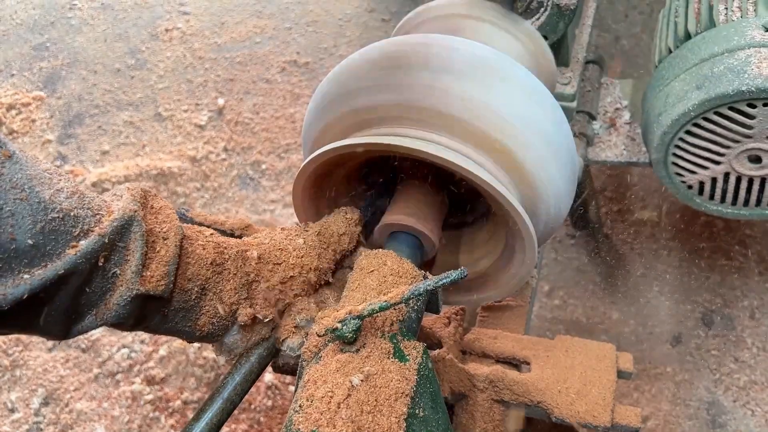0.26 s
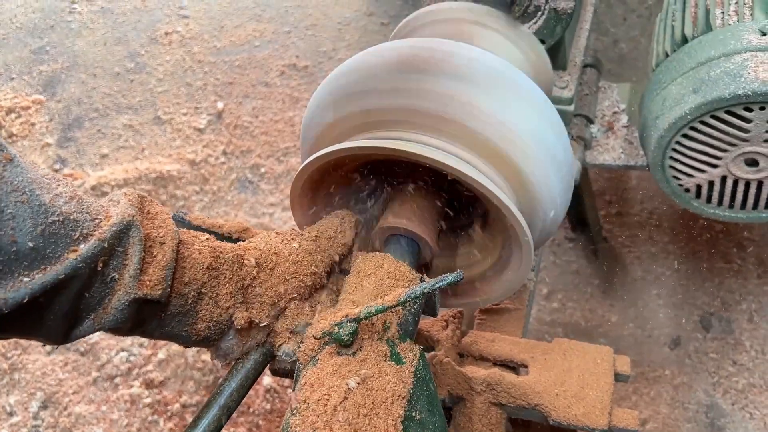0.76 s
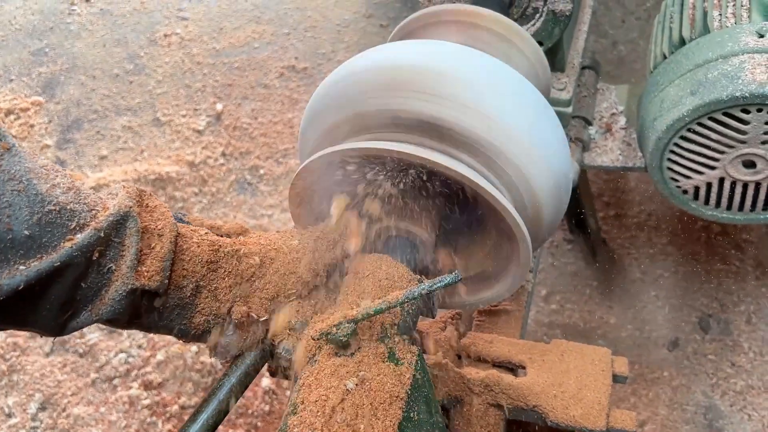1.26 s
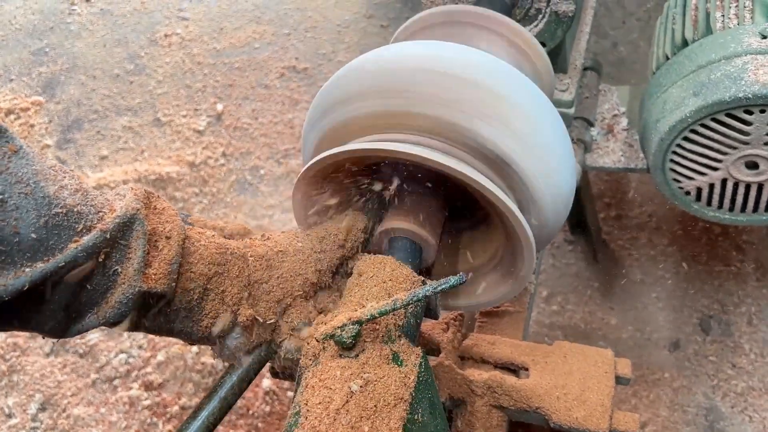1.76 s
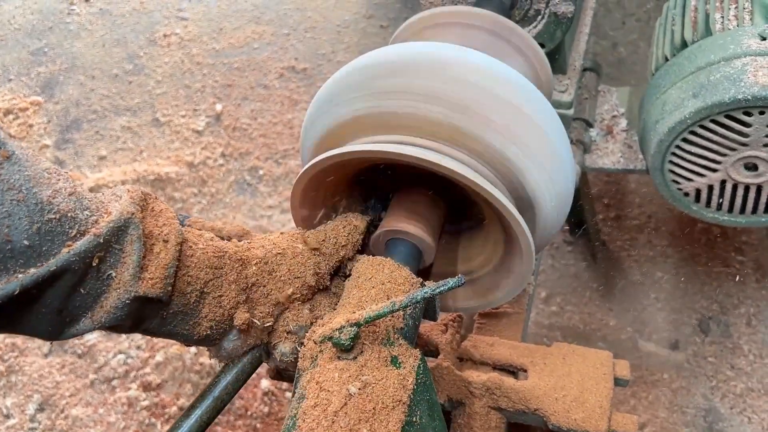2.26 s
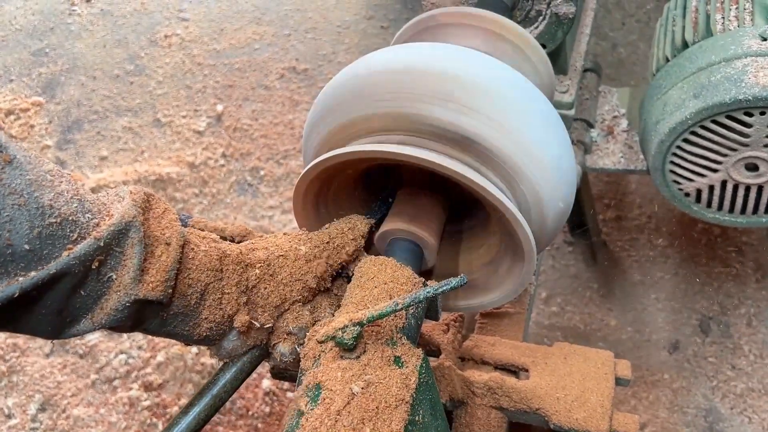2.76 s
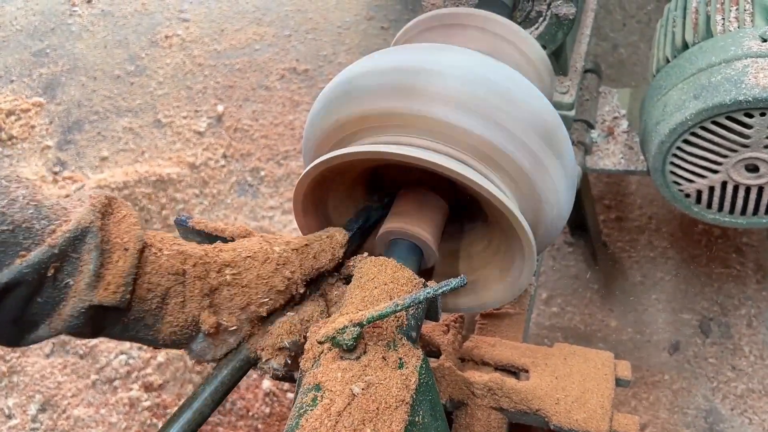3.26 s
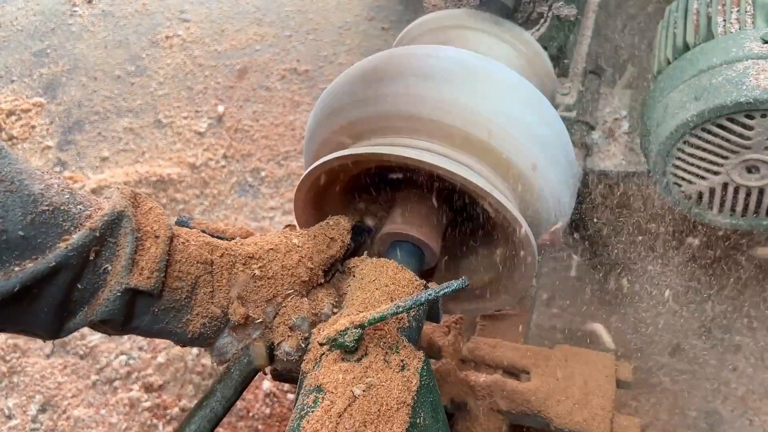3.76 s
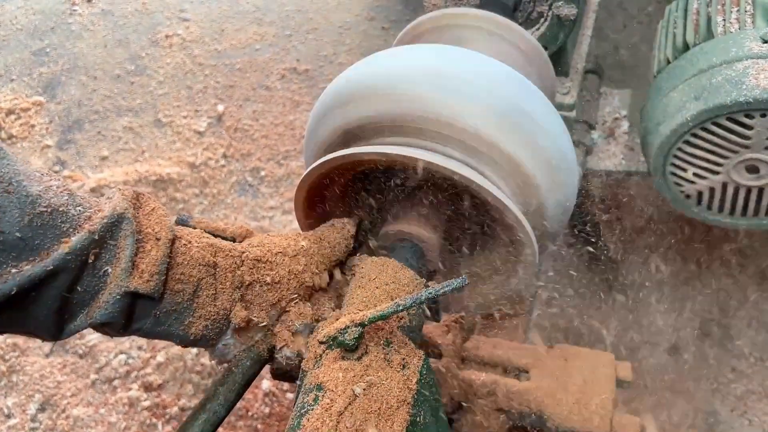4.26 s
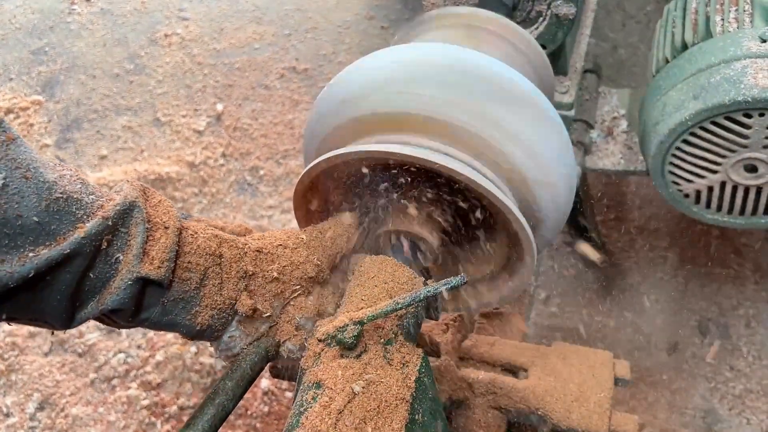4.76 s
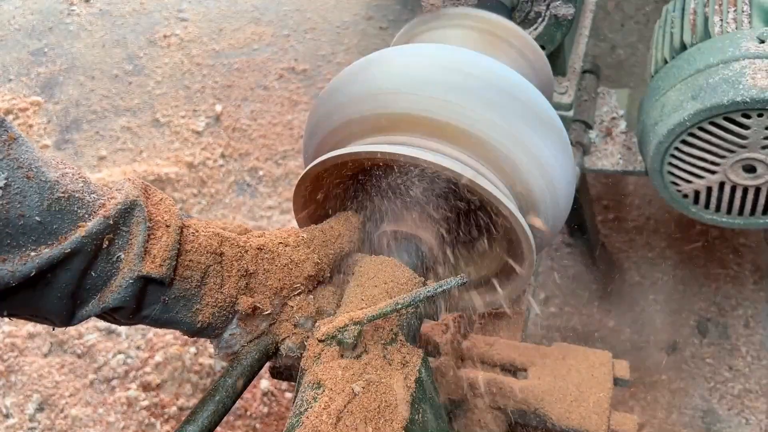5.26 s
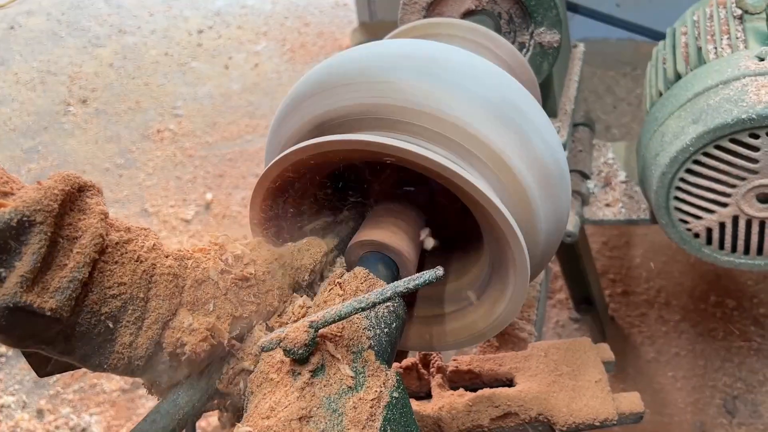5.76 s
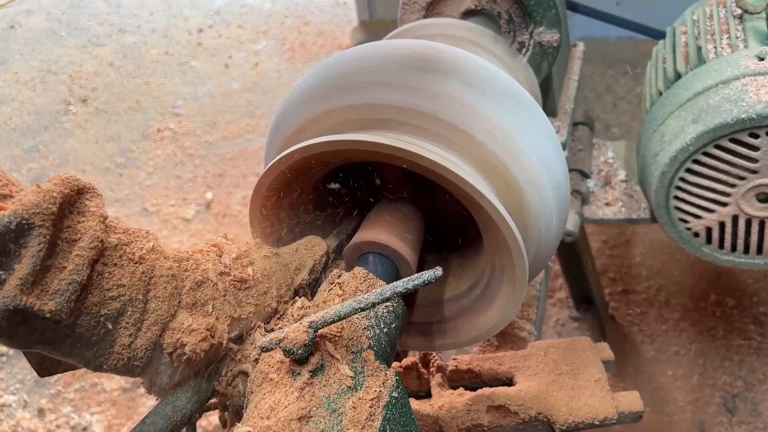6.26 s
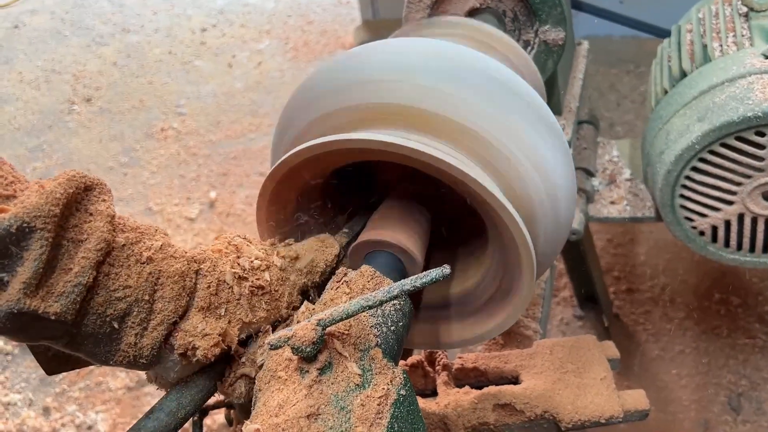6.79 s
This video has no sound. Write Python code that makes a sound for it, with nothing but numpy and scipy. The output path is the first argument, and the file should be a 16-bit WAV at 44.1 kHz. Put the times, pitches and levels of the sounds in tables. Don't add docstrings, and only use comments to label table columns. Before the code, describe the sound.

A lathe hums and rumbles steadily in an open workshop, heard closely in stereo with a short, thin tail. From 0 to 0.45 seconds a hooked steel tool scrapes inside the spinning wooden vessel, with hiss, small chips and brief mid-pitched rings near 900 hertz. It eases off, then from 0.7 regular chatter ticks build, about twenty a second, with swelling scrape. Around 1.65 to 1.95 the shank rings hardest, a rough metallic groan; heavy pulsing bites continue until 3.3. The tool lifts, leaving hum, faint dust hiss and light touches. From 4.5 to 5.45 a quiet skim scrapes with weak rings. A tiny near-silent gap at 5.57 cuts to a closer, louder machine. From 5.7 bright, sizzling shavings and sharp chips dominate, with stronger catches around 6.5 to 6.6, easing near 6.95 before a last touch and low thud at 7.

```python
import sys
import numpy as np
from scipy import signal
from scipy.fft import rfft, irfft, next_fast_len
from scipy.io import wavfile
from scipy.ndimage import uniform_filter1d, map_coordinates

SR = 44100
rng = np.random.default_rng(int(sys.argv[2]) if len(sys.argv) > 2 else 0)


def master(y):
    cut = np.clip(np.atleast_2d(y).T, -1, 1)
    pcm = np.round(cut * 32767)
    wavfile.write(sys.argv[1], SR, pcm.astype(np.int16))


def undo_db(level):
    steps = np.asarray(level, float) / 20
    return 10 ** steps


N = 310023
T = np.arange(N) / SR
HZ = np.fft.rfftfreq(next_fast_len(N), 1 / SR)

PASS_ENDS = 3.4, 5.58
PASS = np.searchsorted(PASS_ENDS, T)

# time_s, edge_pressure_db, hook_grip_db
PUSH_ENTRY = [(0.0, -30, -18), (0.15, -29.5, -20.5), (0.21, -24.5, -16), (0.274, -25, -14.5),
              (0.344, -31, -19.5), (0.419, -29.5, -22), (0.474, -59, -27), (0.519, -58, -36)]
PUSH_BUILD = [(0.673, -45, -24.5), (0.753, -35, -23.5), (0.873, -38, -28.5), (1.053, -27.5, -17),
              (1.117, -33, -22), (1.3, -28, -16.5), (1.537, -31, -21), (1.706, -27, -11), (1.831, -33, -14)]
PUSH_HEAVY = [(1.911, -26.5, -10.5), (2.12, -38, -20.5), (2.33, -29, -14.5), (2.499, -36, -18),
              (2.849, -31, -18), (3.103, -37, -17), (3.278, -33, -16), (3.322, -66, -34), (3.4, -71, -47)]
PUSH_FEEL = [(3.845, -58.5, -47), (3.875, -53.5, -45), (3.95, -50, -38.5), (4.026, -58.5, -50),
             (4.1, -48, -40), (4.2, -42.5, -36), (4.25, -51, -36), (4.3, -60.5, -63), (4.49, -58, -42)]
PUSH_SKIM = [(4.515, -40.5, -43), (4.6, -35.5, -34.5), (4.834, -41, -35.5), (5.073, -41, -34),
             (5.153, -35, -32), (5.253, -45, -35), (5.358, -36.5, -40), (5.43, -44.5, -35),
             (5.465, -74, -39)]
PUSH_NEAR = [(5.7, -79, -57), (5.715, -43, -44), (5.805, -39.5, -33), (5.83, -28, -29), (6.301, -29, -29.5),
             (6.565, -24, -25), (6.69, -29.5, -36.5), (6.93, -35, -33), (6.974, -44, -36),
             (7.029, -40, -37)]
HAND = PUSH_ENTRY + PUSH_BUILD + PUSH_HEAVY + PUSH_FEEL + PUSH_SKIM + PUSH_NEAR
# start_s, wall_scrape_db, fine_spray_db, spray_drift_db_per_s, ring_fall_s
SEATS = [
    (0, -8, -5.5, -8, 0.0074),
    (0.5, -7.5, -5.5, -4.5, 0.0072),
    (1.87, -3.5, -11.5, 1, 0.006),
    (2.479, -4.5, -11, -1.5, 0.014),
    (3.4, -1.5, 1, -0.5, 0.0062),
    (4.48, 1, -5, -2, 0.0042),
    (5.58, 0, -0.5, -11.5, 0.0061),
    (6.96, -2, -5, 53, 0.0065),
]
SCRAPE_FROM_GRIP, SCRAPE_IDLE_DB = 0.38, -46
LIFT_DB, SPRAY_DRIES = -47, 0.73

# time_s, pitch_hz
RING = [(0, 898), (1.7, 892), (2.3, 903), (3.3, 928), (3.5, 900), (5.5, 905), (5.7, 890), (7, 900)]
# start_s, peak_db, length (times the seat's ring fall)
RINGS_DEEP = [(0.065, -20, 0.91), (0.093, -12.5, 1.4), (0.142, -17.5, 2), (0.236, -22, 1.1),
              (0.271, -21.5, 1.2), (0.37, -20, 0.84), (0.434, -18, 1.1), (0.756, -22, 1.1),
              (0.841, -17.5, 1.3), (0.89, -19.5, 1.2), (0.992, -22, 1.7), (1.037, -10.5, 1.3),
              (1.125, -18, 1.7), (1.182, -16.5, 2.1), (1.287, -23, 0.97), (1.344, -21, 0.99),
              (1.355, -15, 0.57), (1.386, -19, 0.63), (1.433, -35, 1.1), (1.481, -15, 1.2),
              (1.596, -15, 0.98), (1.629, -27, 1), (1.654, -7, 1.7), (1.701, -1.5, 1.3), (1.744, -4.5, 1),
              (1.794, -1.5, 1.7), (1.829, -34, 0.82), (1.849, -9.5, 1.15), (1.895, -12, 1.5),
              (1.935, -4.5, 1.2), (2.001, -13, 1.7), (2.118, -16, 1.5), (2.135, -10.5, 2),
              (2.189, -17, 0.79), (2.215, -28, 0.84), (2.236, -6, 0.83), (2.285, -12, 0.87),
              (2.314, -9.5, 2.3), (2.363, -16, 1.1), (2.382, -10, 0.69), (2.411, -11, 0.91),
              (2.475, -19, 1), (2.512, -17, 2.3), (2.63, -19, 1.2), (2.673, -18, 1.9), (2.716, -10.5, 1.15),
              (2.769, -15.5, 2), (2.785, -9, 1.5), (2.84, -12, 0.74), (2.89, -11.5, 1.35), (2.94, -15, 1.6),
              (2.987, -16.5, 1.5), (3.014, -10, 0.7), (3.045, -14, 1.6), (3.102, -18, 2.6),
              (3.158, -11, 0.96), (3.178, -9, 0.6), (3.202, -13.5, 1.3), (3.249, -12, 1.1),
              (3.275, -10, 0.69)]
RINGS_LIGHT = [(4.506, -27, 1.2), (4.536, -25, 1.2), (4.582, -25, 0.91), (4.614, -23, 1.2),
               (4.653, -34, 1.2), (4.702, -31, 1), (4.746, -27, 1.2), (4.776, -25, 1.2), (4.854, -40, 1),
               (4.922, -32, 1.2), (4.971, -20, 1.2), (5.023, -27, 1.2), (5.146, -25, 1.9),
               (5.212, -20, 1.2), (5.263, -31, 1.2), (5.286, -24.5, 1.3), (5.333, -20, 1.2),
               (5.367, -26, 1.2), (5.382, -19, 1.3), (5.436, -22, 1.5)]
RINGS_NEAR = [(5.815, -28, 0.86), (5.884, -25, 0.75), (5.912, -20, 1.2), (5.934, -31, 1.2),
              (5.978, -31, 1.2), (6.013, -20, 0.97), (6.12, -24, 1.2), (6.147, -20, 1.1), (6.178, -25, 1),
              (6.225, -37, 1.1), (6.257, -27, 1.1), (6.399, -27, 1.1), (6.482, -20, 1.3),
              (6.504, -15, 0.92), (6.573, -13.5, 2.6), (6.627, -19, 1.2), (6.723, -22.5, 1.3),
              (6.823, -30, 1.2), (6.901, -33, 0.87), (6.92, -26, 1.2)]
SWELL_DB = 3.5
# start_s, strength_db, knock_db (relative)
BITES = [(0.093, -9.5, -33), (0.27, -17, 0), (0.349, -17, -8), (0.371, -13, -9), (1.037, -9.5, -18),
         (1.125, -17.5, -25), (1.344, -17, -14), (1.595, -14, -7), (1.653, -2.5, -12.5),
         (1.701, -0.5, -13.5), (1.744, -2, -11), (1.776, -8, -11), (1.797, 5, -18), (1.85, -4, -15),
         (1.894, -7, -29), (1.936, -6, -21), (1.998, -8, -8), (2.118, -12, -27), (2.136, -12, -32),
         (2.41, -15, -5), (2.51, -14, -23), (2.629, -11, -9), (2.716, -2, -22), (2.769, -10, -18),
         (3.017, -14, -28), (3.248, -6, -26), (3.273, -5, -6.5), (4.535, -23, -7), (5.146, -27, -10),
         (5.706, -27, -9), (6.504, -12.5, -5), (6.575, -7.5, -9)]
# start_s, end_s, strength_db (of knock and sag), chip_db, chip_hz
RUNS = [(0.142, 0.25, -15, -32, 5000), (2.233, 2.4, -16, -44, 2840), (2.204, 2.38, -19, -34, 2840),
        (2.691, 2.86, -14.5, -25, 2900), (2.887, 3.06, -9.5, -31, 2800), (2.914, 3.13, -13.5, -28, 2010),
        (3.132, 3.24, -15, -21, 1900), (3.16, 3.22, -4, -21, 1900), (5.878, 6.2, -36, -22.5, 3440),
        (6.367, 6.47, -29, -20, 5400), (6.659, 6.72, -19, -17, 5320), (6.77, 6.83, -20, -16.5, 5540),
        (6.819, 6.93, -30, -22.5, 2380), (6.819, 6.93, -32, -21, 1220)]
RUN_KNOCK_DB, UNEVEN_DB, UNEVEN_S = -15, 0.4, 0.0014
LUCK = rng.standard_normal((len(RUNS), 12, 3))
TURNS_PER_S = 20.65
SAG_PER_DB, SAG_FROM_DB = 0.045, -20
# times_a_turn, depth_db, place_turns
GRAIN = [(1, 0.83, 0.75), (2, 0.63, 0.56), (3, 0, 0.17)]

# centre_hz, width_hz, level_db
MODES_DEEP = [(1570, 93, -5.5), (2235, 35, -9.5), (2840, 610, -9), (5020, 110, -4.5), (6000, 90, -6),
              (9120, 83, -9)]
MODES_LIGHT = [(2280, 300, -10), (2700, 59, -11), (5100, 360, -16), (6400, 130, -7), (6920, 130, -3)]
MODES_NEAR = [(2550, 53, -5), (3380, 210, -8), (3830, 200, -6), (5280, 230, -1.5), (5700, 81, -1),
              (6690, 180, -9.5), (7440, 230, -11.5), (9780, 260, -8.5), (11500, 300, -15),
              (14300, 640, -16)]
# freq_hz, density_db (per Hz)
BED_DEEP = [(710, -72), (1200, -4), (1570, -6.5), (2100, -9), (2870, -26), (3790, -13), (5130, 0.5),
            (7640, -12), (9270, -15.5), (12100, -15.5), (15000, -9), (15700, -16.5)]
BED_LIGHT = [(710, -23), (1200, -2), (1590, -4), (1790, -14), (2240, -11.5), (4460, -12), (5130, -0.5),
             (5900, -8), (15700, -20)]
BED_NEAR = [(710, -7), (1200, -11.5), (1680, -8), (2550, -4.5), (4510, -28), (5350, -16), (6160, -21),
            (9890, -15.5), (14400, -24), (15700, -38)]
PATCHY_DB = 1.6
WAVER, WAVERS_PER_S = 0.005, 9
# start_s, peak_db, centre_hz
CHIPS = [(0.3172, -21, 5000), (0.4058, -19, 1490), (1.0276, -18, 1580), (1.6527, -13.5, 1630),
         (1.9042, -14, 1510), (2.0009, -18, 1650), (2.802, -17, 2960), (3.1116, -21.5, 1990),
         (3.2587, -16.5, 1930), (5.5927, -48, 1490), (5.708, -41, 5300), (5.712, -34, 3500),
         (5.74, -26, 5160), (5.8217, -25, 3400), (6.033, -16.5, 3520), (6.5308, -15, 5400),
         (6.565, -18, 5160), (7.022, -22, 2350), (4.535, -35, 1600), (5.146, -32, 1500), (6.726, -27, 6800),
         (6.59, -22, 6700)]
# start_s, peak_db, centre_hz, snap_db (relative)
TICKS = [(0.695, -33, 1580, -11), (0.744, -36, 1570, -7), (0.7933, -25.5, 1440, -9),
         (0.84, -24.5, 1590, -6.5), (0.89, -26.5, 1530, -4), (0.9358, -27.5, 1620, -8),
         (0.9931, -25, 1620, -12), (1.1393, -30, 1590, -3), (1.1874, -34, 1610, -14),
         (1.237, -24.5, 1560, -3.5), (1.2845, -26, 1520, -17), (1.3347, -20, 1540, -12),
         (1.362, -27, 1650, -5), (1.382, -24, 1600, -4), (1.4341, -24, 1570, -13),
         (1.5764, -22.5, 1570, -13)]

# centre_hz, width_hz, level_db
HOLLOW = [(478, 60, -.5), (578, 20, 1), (825, 35, -4)]
# freq_hz, density_db (per Hz)
HUM = [(180, -60), (300, -27), (473, 0), (675, 1), (824, -17), (1010, -12.5), (1460, -9.5), (9000, -58),
       (11700, -92), (19800, -120)]
# freq_hz, density_db (per Hz)
RUMBLE = [(12, -40), (20, -18), (65, -14), (75, -4.5), (92, -7), (107, 1), (162, -4.5), (304, -5.5),
          (360, -3), (470, 0.5), (790, -120)]
# pitch_hz, level_db
TONE = (104, -48.5)
# hum_db, rumble_db
IDLE = [(-36, -46), (-38, -49), (-31.5, -44)]
HUM_PER_LOAD, RUMBLE_PER_LOAD, LOAD_LAG_S = 0.14, 0.39, 0.038
# time_s, hum_db, rumble_db
JOLTS = [
    (1.045, 4.5, 1),
    (1.2, 3.5, 3.5),
    (1.8, 3.5, 5.5),
    (2.88, -0.5, 1),
    (5.64, 1.5, 3.5),
    (6.01, 3.5, 2.5),
    (6.62, 4.5, 0),
    (7.02, -2.5, 6),
]
JOLT_S = 0.069
# start_s, end_s, level_db
DUST = (3.6, 4.3, -66)

# fade_start_s, silent_s, return_s, gap_db
SPLICE = (5.561, 5.569, 5.5905, -36)
# start_s, end_s, level_db
GAP_NOISE = (5.555, 5.6, -76)
# freq_hz, lean_db
LEAN = [(60, -3), (130, -1), (290, 2.5), (640, -0.5), (1410, -1.5), (3100, -2), (6820, 2.5), (15000, -2)]
EDGE_HZ = 15750
DROPPED = (.11, .14, .36)
WHIM = (.6, .6, 2.2)


def shank(swells):
    hz = curve(RING, 1)
    phase = 2 * np.pi * np.cumsum(hz + 9 * wander(50)) / SR
    apart = np.pi / 4 * np.tanh(6 * wander(7)) + 0.15 * wander(30)
    held = undo_db(grip_db() - 7.5 + grain_db() + 2.5 * wander(70))
    blur = np.choose(PASS, [0.06, 0.5, 0.7])
    centre = np.choose(PASS, [0.93, 0.98, 1.04]) + 0.045 * wander(15)
    level = np.hypot(0.68 * swells, np.sqrt(1 - blur) * held)
    ring = level * np.sin(phase + np.array([apart, -apart]))
    drive = tearing(0.9, 40, 1)
    skirt = evened(resonate(resonate(drive, centre * hz, 196), centre * hz, 226))
    return ring + undo_db(grip_db() + 4.5) * np.sqrt(blur) * skirt


def bite_swells(rise=0.0044, knock=0.0056):
    power, t = np.zeros((2, N)), np.arange(2500) / SR
    for s, db, length in RINGS_DEEP + RINGS_LIGHT + RINGS_NEAR:
        fall = seat(4, s) * max(length, 0.3)
        attack = np.sin(np.pi / 2 * np.minimum(t / rise, 1)) ** 2
        swell = undo_db(db + SWELL_DB) * attack * np.exp(-(np.maximum(t - rise, 0) / fall) ** 2.7)
        add(power[:1], s - 0.0015, swell[None] ** 2)
    for s, db, knock_db in BITES + [(s, db, RUN_KNOCK_DB) for s, db, _, _ in turns()]:
        thud = undo_db(db + knock_db - 9.5) * t / knock * np.exp(1 - t / knock)
        add(power[1:], s - 0.0015, thud[None] ** 2)
    return np.sqrt(power)


def turns():
    rows = []
    for (start, end, strength_db, chip_db, hz), luck in zip(RUNS, LUCK):
        speed = TURNS_PER_S - SAG_PER_DB * max(strength_db - SAG_FROM_DB, 0)
        for s, (late, ring, chip) in zip(np.arange(start, end, 1 / speed), luck):
            rows.append((s + UNEVEN_S * late, strength_db + UNEVEN_DB * ring, chip_db + UNEVEN_DB * chip, hz))
    return rows


def shavings(knocks):
    wall_band = above(720) - above(4020)
    edge_band = above(3780) - above(9500)
    spray_band = above(8500)
    edge, fresh = tearing(0.84, 150, 0.16), rng.standard_normal((2, N))
    wall = tearing(1.3, 100, 1)
    pressure, scrape_level, spray = undo_db(pressure_db()), undo_db(scrape_db() - 1), undo_db(spray_db())
    lifted = 1 - undo_db(np.clip(pressure_db() - scrape_db() + 8, -14, 0))
    out = np.zeros((2, N))
    holds = [(MODES_DEEP, BED_DEEP), (MODES_LIGHT, BED_LIGHT), (MODES_NEAR, BED_NEAR)]
    for k, (modes, bed) in enumerate(holds):
        colour = tool_colour(modes, bed)
        hiss = coloured(edge, colour * edge_band) + spray * coloured(edge, colour * spray_band)
        rub = coloured(wall, colour * wall_band)
        rub = rub - lifted * filtered(rub, above(2500))
        scrape = scrape_level * rub + knocks * coloured(fresh, colour * wall_band)
        out += (PASS == k) * (pressure * hiss + scrape)
    return out


def pressure_db():
    return curve(HAND, 1)


def grip_db():
    return curve(HAND, 2)


def scrape_db():
    pressure = pressure_db()
    rub = pressure + SCRAPE_FROM_GRIP * (grip_db() - pressure) + uniform_filter1d(seat(1), size=2000)
    return 10 * np.log10(undo_db(2 * rub) + undo_db(2 * SCRAPE_IDLE_DB))


def spray_db():
    drift = seat(3) * (T - seat(0))
    return seat(2) + drift + SPRAY_DRIES * np.minimum(pressure_db() - LIFT_DB, 0)


def seat(column, t=T):
    rows = np.array(SEATS)
    return rows[np.searchsorted(rows[:, 0], t, "right") - 1, column]


def grain_db():
    return sum(db * np.cos(2 * np.pi * k * (TURNS_PER_S * T - place)) for k, db, place in GRAIN)


def tearing(flicker_db, fibres_per_s, fibre_db):
    strength = undo_db(fibre_db * np.minimum(rng.exponential(1, N), 4))
    snaps = (rng.random(N) < fibres_per_s / SR) * strength
    snaps = signal.lfilter([1], [1, -0.985], snaps)
    swell = undo_db(grain_db() + flicker_db * wander(70))
    return rng.standard_normal((2, N)) * swell * (1 + snaps)


def tool_colour(modes, bed, bed_db=-3):
    peaks = sum(undo_db(db) ** 2 / (1 + (2 * (HZ - hz) / width) ** 2) for hz, width, db in modes)
    return np.sqrt(peaks + (undo_db(bed_db) * read(bed)) ** 2)


def patchy(x):
    z = signal.stft(x, SR, nperseg=512)[2]
    field = uniform_filter1d(rng.standard_normal(z.shape[1:]), size=6, axis=0)
    field = uniform_filter1d(field, size=9, axis=1)
    return signal.istft(z * undo_db(PATCHY_DB * evened(field)), SR, nperseg=512)[1][:, :N]


def wavering(x, share):
    speed = share * coloured(rng.standard_normal(N), (HZ < WAVERS_PER_S) * (HZ > 1.5))
    at = np.arange(N) + np.cumsum(speed)
    return np.array([map_coordinates(side, [at], order=3, mode="mirror") for side in x])


def chips(length=0.0037):
    out, t = np.zeros((2, N)), np.arange(900) / SR
    every = CHIPS + [(s, db, hz) for s, _, db, hz in turns()]
    for s, db, hz in every:
        noise = rng.standard_normal((2, 900))
        puff = evened(resonate(noise, hz + 0 * t, 0.043 * hz)) + 0.2 * noise
        add(out, s, undo_db(db - 7.5) * puff * t / length * np.exp(1 - t / length))
    return out


def ticks(ring_s=0.0047, snap_s=0.0019):
    ring, snap, t = np.zeros((2, N)), np.zeros((2, N)), np.arange(1500) / SR
    for (s, db, hz, snap_db), luck in zip(TICKS, rng.random((len(TICKS), 2, 1))):
        envelope = undo_db(db + 4) * np.minimum(t / 0.0011, 1) * np.exp(-t / ring_s)
        add(ring, s, envelope * np.sin(2 * np.pi * (hz * t + luck)))
        add(snap, s, undo_db(db + snap_db + 2.5) * np.ones((2, 1)) * t / snap_s * np.exp(1 - t / snap_s))
    return ring + snap * coloured(rng.standard_normal((2, N)), above(1900) - above(4600))


def machine():
    bearings = tearing(0.8, 20, 1)
    hum = wavering(coloured(bearings, tool_colour(HOLLOW, HUM, -6)), WAVER)
    rumble = coloured(rng.standard_normal((2, N)), read(RUMBLE) * above(55)) * undo_db(2.2 * wander(28))
    ground = coloured(rng.standard_normal((2, N)), read(RUMBLE) * (1 - above(59))) * undo_db(2.9 * wander(28))
    tone_hz = TONE[0] + 7 * np.array([wander(16), wander(18)])
    tone = undo_db(TONE[1] + 4.7 * wander(18)) * np.sin(2 * np.pi * np.cumsum(tone_hz, axis=1) / SR)
    hum_db, rumble_db = strain(0), strain(1)
    return undo_db(hum_db + 3) * hum + undo_db(rumble_db + 3.5) * rumble + undo_db(0.5 * rumble_db - 32.5) * ground + tone


def strain(column):
    load_db = uniform_filter1d(scrape_db() - SCRAPE_IDLE_DB, round(LOAD_LAG_S * SR))
    jolts = sum(row[1 + column] * np.exp(-((T - row[0]) / JOLT_S) ** 2) for row in JOLTS)
    return np.array(IDLE)[PASS, column] + [HUM_PER_LOAD, RUMBLE_PER_LOAD][column] * load_db + jolts


def dust():
    start, end, db = DUST
    fall = np.interp(T, [start - 0.08, start + 0.08, end, end + 0.1], [0, 1, 1, 0])
    return undo_db(db) * fall * coloured(rng.standard_normal((2, N)), above(6500))


def workshop(x, t60=0.3, wet_db=-12):
    t = np.arange(SR // 3) / SR
    tail = rng.standard_normal((2, len(t))) * undo_db(-60 * t / t60) * (t > 0.006)
    return x + undo_db(wet_db) * signal.fftconvolve(x, tail / np.linalg.norm(tail[0]), axes=1)[:, :N]


def thinned(x, from_hz=10000):
    hz, t, z = signal.stft(x, SR, nperseg=1024, noverlap=768)
    power = uniform_filter1d((abs(z) ** 2).mean(0, keepdims=True), size=9, axis=2)
    share_of_all = uniform_filter1d(power, size=5, axis=1) / (power.sum(1, keepdims=True) + 1e-12)
    under = np.log(share_of_all + 1e-20)
    whim = np.kron(rng.standard_normal((65, len(t) // 8 + 1)), np.ones((8, 8)))[:len(hz), :len(t)]
    whim = (whim - 1.2 * (hz > 14800)[:, None]) * (hz > 12050)[:, None]
    treble, which = (hz > from_hz) & (hz < EDGE_HZ), np.searchsorted(PASS_ENDS, t)
    under = under + np.array(WHIM)[which] * whim
    faint = under[:, treble]
    limit = np.array([np.quantile(faint[:, :, which == k], share) for k, share in enumerate(DROPPED)])
    kept = (under > limit[which]) | ~treble[:, None]
    valley = (hz > 2900) & (hz < 4900)
    depth = under - np.median(under[:, valley], axis=1, keepdims=True)
    kept &= (depth > np.quantile(depth[:, valley], 0.01)) | ~valley[:, None]
    return signal.istft(z * kept, SR, nperseg=1024, noverlap=768)[1][:, :N]


def resonate(x, hz, width):
    turn, r = np.exp(2j * np.pi * np.cumsum(hz) / SR), np.exp(-np.pi * width / SR)
    return 2 * (turn * signal.lfilter([1 - r], [1, -r], x / turn)).real


def wander(hz):
    return coloured(rng.standard_normal(N), (HZ < hz) * (HZ > 3) / np.sqrt(HZ + 8))


def above(hz):
    return 1 / (1 + (hz / (HZ + 1)) ** 12)


def read(points):
    f, db = np.transpose(points)
    return undo_db(np.interp(np.log(HZ + 1), np.log(f + 1), db))


def filtered(x, gain):
    return irfft(rfft(x, next_fast_len(N)) * gain, next_fast_len(N))[..., :N]


def evened(x):
    return x / np.sqrt(np.mean(x ** 2) + 1e-20)


def coloured(x, gain):
    return evened(filtered(x, gain))


def curve(rows, column):
    rows = np.array(rows)
    return np.interp(T, rows[:, 0], rows[:, column])


def add(mix, s, sound):
    part = mix[:, max(round(s * SR), 0):][:, :sound.shape[1]]
    part += sound[:, :part.shape[1]]


def scene():
    swells, knocks = bite_swells()
    cutting = patchy(wavering(shavings(knocks), WAVER))
    tool = shank(swells) + cutting + chips() + ticks()
    return workshop(tool) + machine() + dust()


def band_limit(x):
    return signal.sosfilt(signal.butter(12, 16470, fs=SR, output="sos"), x)


def record(dry):
    fade, silent, back, gap_db = SPLICE
    gap_gain = undo_db(gap_db)
    gate = np.interp(T, [fade, silent, back, back + 0.001], [1, gap_gain, gap_gain, 1])
    start, end, gap_noise_db = GAP_NOISE
    gap_noise = coloured(rng.standard_normal((2, N)), 1 - above(13000))
    gap_noise = undo_db(gap_noise_db) * (T > start) * (T < end) * gap_noise
    rounded = 0.86 * np.tanh(dry / 0.98) * gate + gap_noise
    lean = np.sqrt(read(LEAN))
    leaned = filtered(rounded, np.array([lean, 1 / lean]) * (HZ < EDGE_HZ))
    return band_limit(thinned(leaned))


dry = scene()
out = record(dry)
master(out)
```